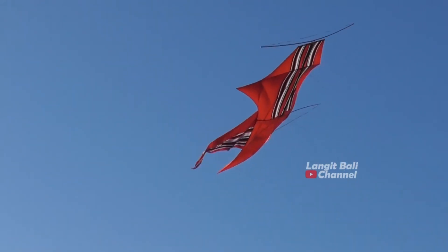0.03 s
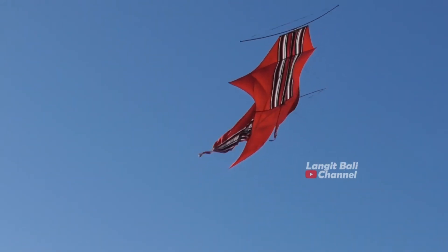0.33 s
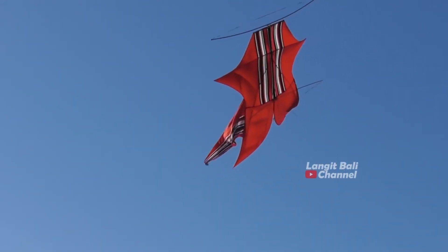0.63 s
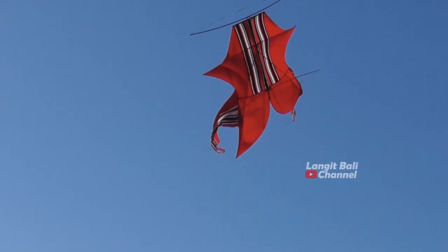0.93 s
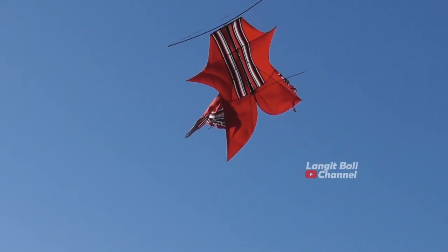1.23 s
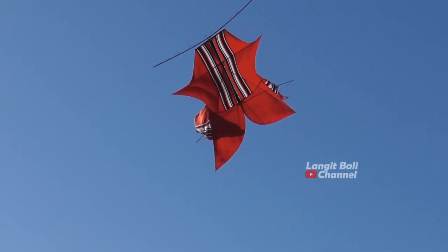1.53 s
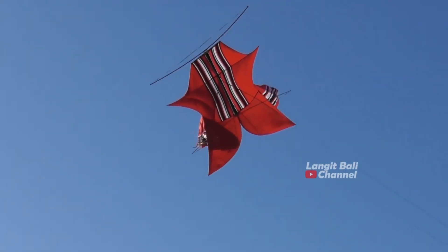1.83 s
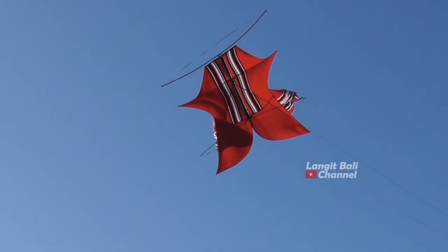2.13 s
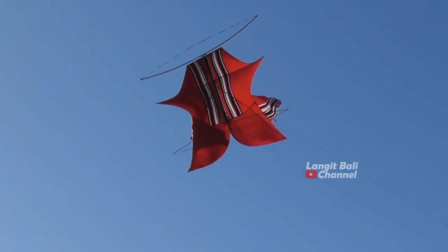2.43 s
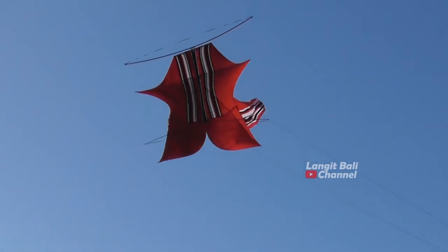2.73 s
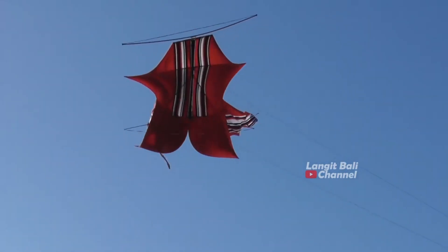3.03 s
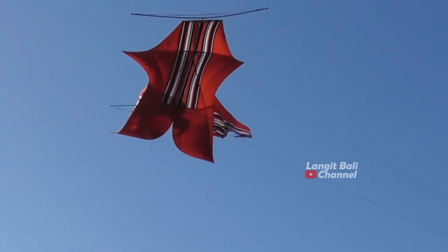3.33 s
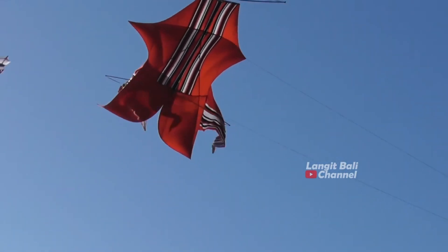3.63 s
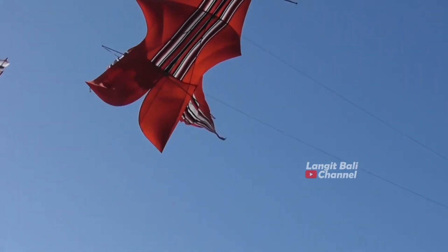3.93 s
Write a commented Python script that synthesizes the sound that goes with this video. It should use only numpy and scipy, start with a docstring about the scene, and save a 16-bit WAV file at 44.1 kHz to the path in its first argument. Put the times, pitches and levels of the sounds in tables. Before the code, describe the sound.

Large kites hum overhead in strong wind, their taut ribbons swooping rapidly in pitch over a steady drone. The nearest one rasps, more strongly later on. Wind hisses and rumbles on the microphone, and a bird chirps faintly once, early.

```python
"""Outdoors in strong wind, big kites fly, each carrying a bow strung with a taut ribbon that hums.
Each ribbon twists to and fro about 13 times a second, so its pitch swoops up and down.
The nearest one rasps at the top of its swoops, a lower one throbs, and the rest blend into a drone.
Wind hisses and rumbles on the microphone, and a bird gives one falling call."""
import sys
import numpy as np
from scipy import signal
from scipy.io import wavfile
from scipy.ndimage import uniform_filter1d, minimum_filter1d

SR = 44100
rng = np.random.default_rng(int(sys.argv[2]) if len(sys.argv) > 2 else 0)


def output_pcm(signal):
    """Save a mono or channel-first signal as 16-bit PCM at the path in sys.argv[1].

    Samples are clipped to [-1, 1] before scaling.
    """
    pcm = np.clip(np.atleast_2d(signal).T, -1, 1) * 32767
    wavfile.write(sys.argv[1], SR, np.round(pcm).astype(np.int16))


N = 176400
TIME = np.arange(N) / SR
HISS_FLICKER_DB, HISS_PAN_DB = 2.5, -0.16


def from_db(db):
    """Turn decibels into a number to multiply a sound by."""
    return 10 ** (np.asarray(db) / 20)


def rms_one(x):
    """Scale a signal so its average strength (rms) is 1."""
    return x / np.sqrt(np.mean(x ** 2) + 1e-20)


def in_time(rows):
    """Join a table's timed points with straight lines, one curve for each column after the time."""
    time_s, *columns = np.transpose(rows)
    return [np.interp(TIME, time_s, column) for column in columns]


def panned(x, pan_db):
    """Raise the left side and lower the right by pan_db."""
    return x * from_db([[pan_db], [-pan_db]])


def drift(rate_hz):
    """A smooth random wobble of typical size 1 that changes about rate_hz times a second."""
    step, warm_up = 40, 2000
    memory = np.exp(-2 * np.pi * step * rate_hz / SR)
    noise = rng.standard_normal(N // step + warm_up + 2)
    slow = signal.lfilter([1], [1, -2 * memory, memory * memory], noise)[warm_up:]
    return np.interp(np.arange(N) / step, np.arange(len(slow)), rms_one(slow))


def air_noise(spectrum, flicker_db):
    """Stereo noise of strength 1, made of half-octave bands that flicker partly together."""
    pitch_hz, *columns = np.transpose(spectrum)
    out, together = 0, drift(4.0)
    edges_hz = 14 * 2 ** np.arange(0, 10.1, .5)
    white = rng.standard_normal((2, 2, N))
    for k, (low, high) in enumerate(zip(edges_hz, edges_hz[1:])):
        if high < pitch_hz[0] or low > pitch_hz[-1]:
            continue
        band = signal.butter(3, [low, high], "band", fs=SR, output="sos")
        middle, side = signal.sosfilt(band, white[k % 2])
        band_db, width_db = (np.interp(np.log(low * high) / 2, np.log(pitch_hz), c) for c in columns)
        stereo = middle + from_db(width_db) * side * [[1], [-1]]
        out = out + from_db(band_db + flicker_db * (together + drift(46)) / 2) * stereo
    return rms_one(out)


def with_echoes(x, echoes):
    """Add the later, quieter copies that bounce off the ground and surroundings."""
    return x + sum(from_db(db) * np.interp(TIME - delay, TIME, x, left=0) for delay, db in echoes)


def bell(x, width):
    """A smooth bump that is 1 where x is 0."""
    return np.exp(-.5 * (x / width) ** 2)


def burst(peak_s, rise_s, fall_s):
    """A smooth rise and fall that reaches 1 at peak_s."""
    width_s = np.where(TIME < peak_s, rise_s, fall_s)
    return np.exp(-.5 * np.minimum(((TIME - peak_s) / width_s) ** 2, 60))


def swoop(swoops, sharpness=1.4):
    """Pitch lift: 1 at each whole swoop, 0 halfway between; sharpness above 1 makes it linger low."""
    return np.abs(np.cos(np.pi * swoops)) ** (2 * sharpness)


def vibration(hz, wander, jitter):
    """A ribbon's phase (its place in the wave); swirling air shakes its pitch slowly and quickly."""
    unsteady = 1 + wander * drift(11.66) + jitter * drift(117.3)
    return 2 * np.pi * (np.cumsum(hz * unsteady) / SR + rng.random())


def wind():
    """Gusts hiss, and air beating on the microphone rumbles."""
    # loudness of the hiss and of the rumble: time_s, level_db
    hiss_levels = [(0, -29), (.15, -34.5), (.3, -31), (.55, -32.5), (1.0, -35), (1.35, -39), (1.6, -35),
                   (2.1, -37), (2.6, -35), (3.1, -36.5), (3.48, -37.5), (3.58, -34), (3.8, -33), (4, -31)]
    rumble_levels = [(0, -22), (.6, -25.5), (1.5, -27.5), (2.3, -27.5), (2.43, -25), (2.52, -21),
                     (2.65, -26), (2.9, -24.5), (3.3, -30), (3.7, -24), (4, -24)]
    # tone of each, from low to high: pitch_hz, relative_level_db, stereo_width_db
    hiss_spectrum = [(406, -11, -13), (736, 7, -12), (1010, -3.5, -7), (1360, -5, -13.5), (2020, -11, -9.5),
                     (2500, -11.5, -26.5), (3955, -18, -27.5), (5400, -33.5, -18.5), (6100, -30.5, -21),
                     (7830, -28.5, -12), (9140, -48.5, -11.5), (11000, -54.5, -14.5), (14000, -72.5, -7.5)]
    rumble_spectrum = [(20, -5, -6.5), (35, -6, -6.5), (59.7, -4, -14.5), (90, -2.5, -7.5), (116, -5, -4),
                       (162, 1, -9), (295, -8, 2), (642, -3, -12), (1080, -37.5, -8)]
    hiss_db, = in_time(hiss_levels)
    rumble_db, = in_time(rumble_levels)
    hiss = from_db(hiss_db) * air_noise(hiss_spectrum, HISS_FLICKER_DB)
    rumble = from_db(rumble_db) * air_noise(rumble_spectrum, flicker_db=-1)
    return panned(hiss, HISS_PAN_DB) + rumble


def bird():
    """One raspy falling chirp, scattered by the surroundings."""
    # the chirp's path: time_s, pitch_hz, level_db
    chirp = [(.733, 8300, -52), (.738, 7600, -40), (.749, 6900, -40), (.764, 5500, -41), (.78, 5100, -40),
             (.80, 4700, -42.5), (.835, 4200, -46), (.866, 3720, -42), (.884, 3550, -53)]
    # its echoes: delay_s, level_db
    echoes = [(.0096, -6), (.019, -13)]
    rasp_hz, tail_db, tail_s = 560, -24, 0.11
    hz, level_db = in_time(chirp)
    sounding = (TIME > chirp[0][0]) & (TIME < chirp[-1][0])
    smoothing = signal.butter(2, rasp_hz, fs=SR, output="sos")
    rasp = rms_one(signal.sosfilt(smoothing, rng.standard_normal((2, N))))
    phase = 2 * np.pi * np.cumsum(hz) / SR
    rough_tone = (1 + rasp[0]) * np.sin(phase) + rasp[1] * np.cos(phase)
    call = sounding * from_db(level_db) * rms_one(rough_tone)
    t = TIME[:SR // 4]
    scatter = rms_one(rng.standard_normal((2, len(t))) * from_db(-60 * t / tail_s)) / np.sqrt(len(t))
    tail = from_db(tail_db) * signal.fftconvolve(call[None], scatter)[:, :N]
    return panned(with_echoes(call, echoes) + tail, pan_db=-1.5)


def far_ribbons():
    """Distant ribbons drone, each swooping at its own pace; distance takes away their treble."""
    # each ribbon before the wind's push: swoops_per_s, bottom_hz, top_hz, level_db
    ribbons = [(12.3, 240, 370, -20), (11.4, 320, 450, -21.5), (13.6, 195, 290, -23), (12.7, 380, 480, -24),
               (10.6, 155, 240, -30)]
    # how the wind pushes them all: time_s, boost_db, pitch_factor
    wind_push = [(0, -2.5, 1.11), (.6, 1, 1.008), (1.1, -1, 1.008), (1.6, 1, 1.011), (2.1, 0.5, 0.99),
                 (2.5, 0.5, 1.01), (2.9, -1, 1), (3.47, -1, 0.96), (3.65, 2, 1.027), (4, 1.5, 0.92)]
    octave_db, swell_db, flutter_db, dull_hz = -12.5, 0.5, 2, 780
    boost_db, pitch_factor = in_time(wind_push)
    out = 0
    for rate, bottom_hz, top_hz, level_db in ribbons:
        swoops = np.cumsum(rate * (1 + .07 * drift(2.238))) / SR + rng.random()
        lift = swoop(swoops)
        hz = pitch_factor * (bottom_hz + (top_hz - bottom_hz) * lift)
        phase = vibration(hz, wander=.03, jitter=.015)
        tone = np.sin(phase) + from_db(octave_db) * lift * np.sin(2 * phase)
        swell = from_db(swell_db * lift + flutter_db * drift(11))
        out = out + from_db(level_db) * rms_one(tone * swell)
    return signal.sosfilt(signal.butter(6, dull_hz, fs=SR, output="sos"), from_db(boost_db) * out)


def low_ribbon():
    """A lower ribbon throbs in short hums that rise slightly in pitch."""
    # one row for each throb: peak_s, pitch_hz, relative_level_db
    throbs = [(0.025, 368, -14.5), (0.069, 301, -11), (.111, 357, -9.5), (.191, 371, -10), (.24, 317, -10),
              (.355, 405, -12.5), (.409, 354, -13.5), (.522, 312, -10), (.605, 301, -12),
              (0.677, 299.6, -15.5), (.757, 305, -10), (.869, 263, -7.5), (0.952, 275.4, -7),
              (1.039, 259.7, -9), (1.121, 247.2, -4.5), (1.205, 267.9, -7.5), (1.268, 329, -11.5),
              (1.39, 337, -13), (1.478, 325, -12.5), (1.583, 318, -14), (1.65, 271, -6.5),
              (1.742, 275, -10), (1.847, 277, -10), (2.0, 279.9, -12), (2.088, 285.9, -17),
              (2.171, 280, -13.5), (2.26, 298.5, -12.5), (2.436, 246.3, -8.5), (2.516, 264.9, -6.5),
              (2.6, 291.1, -8.5), (2.67, 298, -13), (2.757, 308.9, -10), (2.872, 264.1, -7),
              (2.965, 282.3, -22), (3.072, 278.4, -12), (3.143, 250, -10.5), (3.601, 318.5, -12),
              (3.694, 322.8, -15.5), (3.891, 273, -19), (3.976, 237.6, -8)]
    half_length_s, rise_hz_per_s, boost_db, octave_db = 0.009, 700, 0.5, -20.5
    out = np.zeros(N)
    for (peak_s, hz, db), start_cycle in zip(throbs, rng.random(len(throbs))):
        sounding = np.abs(TIME - peak_s) < .06
        t = TIME[sounding] - peak_s
        phase = 2 * np.pi * (start_cycle + hz * t + rise_hz_per_s * t ** 2 / 2)
        tone = np.sin(phase) + from_db(octave_db) * np.sin(2 * phase)
        out[sounding] += from_db(boost_db + db) * bell(t, half_length_s) * tone
    return np.sqrt(2) * out


def near_ribbon():
    """The nearest ribbon twists and hums, breaking into a rasp and a hiss at the top of its swoops."""
    # pace of the twisting: time_s, swoops_done
    swoop_counts = [(0, 0), (.268, 3), (.757, 9), (1.304, 16), (1.541, 19), (1.615, 20), (1.93, 24),
                    (2.311, 29), (2.471, 31), (3.085, 39), (3.158, 40), (3.463, 44), (4, 50.3)]
    # the hum before its wobbles and swells: time_s, bottom_pitch_hz, level_db
    hum_path = [(0, 340, -17), (.4, 315, -18.5), (.8, 290, -16.5), (1.15, 270, -17), (1.5, 290, -16),
                (1.8, 275, -19.5), (2.1, 270, -20.5), (2.47, 265, -19), (2.8, 275, -15), (3.3, 275, -21),
                (3.65, 270, -21.5), (4, 260, -18)]
    # one row for each rasp: peak_s, top_pitch_hz, rasp_strength_db, hiss_level_db
    rasps = [(.008, 431.6, -9.5, -49), (.092, 429.3, -8, -41.5), (0.181, 426.6, -12.5, -46.5),
             (0.265, 416.8, -7.5, -44), (0.431, 418.5, -12.5, -39.5), (0.511, 390, -14, -44.5),
             (.595, 374.7, -10, -52), (.675, 372, -11, -48), (.759, 372.3, -5, -42), (0.83, 388.1, -8, -51),
             (0.914, 378, -8, -42), (1.04, 374.6, -15, -38.5), (1.306, 388.3, -5, -39.5),
             (1.383, 374.8, -9.5, -42), (1.467, 417.6, -7.5, -43.5), (1.542, 401.7, -5.5, -40),
             (1.612, 371, -8, -37.5), (1.695, 395, -8, -40), (1.772, 392, -2, -42), (1.932, 372, -11, -41),
             (2.007, 381.6, -7, -50), (2.084, 387.5, -3.5, -38.5), (2.159, 370.6, -8, -37.5),
             (2.233, 378, -4, -38), (2.309, 367.9, -8, -43), (2.39, 392, -3, -37.5),
             (2.469, 410.2, -5.5, -38.5), (2.547, 398, -6.5, -41), (2.62, 379.4, -7.5, -42),
             (2.7, 388, 1, -38.5), (2.778, 388, -3, -44.5), (2.853, 390.8, 2.5, -38),
             (2.932, 379.4, 0, -40.5), (3.006, 383.7, -3.5, -38.5), (3.085, 375.2, -0.5, -38),
             (3.157, 384.3, 3.5, -35), (3.235, 389.8, 0.5, -40.5), (3.31, 395.5, -3, -37),
             (3.389, 386, -2, -39.5), (3.462, 372.8, -2, -42.5), (3.542, 360.4, -4.5, -46),
             (3.615, 368.3, -9, -39.5), (3.728, 379.8, -4, -38.5), (3.805, 362, -4, -40.5),
             (3.89, 409.7, -5.5, -46.5)]
    # the tones in a rasp: pitch_multiple, relative_level_db
    rasp_tones = [(1, -8.5), (2, -14.5), (3, -40), (4, -43)]
    # tone of the rasp's hiss: pitch_hz, relative_level_db, stereo_width_db
    hiss_spectrum = [(500, -1, -13.5), (900, -0.5, -7), (1370, -2, -14.5), (2100, -2.5, -22.5),
                     (2800, -4, -18), (4360, -14, -25), (5940, -23.5, -16), (8640, -29, -11.5),
                     (11000, -45.5, -6), (14000, -72.5, -15)]
    glide_db, bottom_swell_db, flutter_db = -5, 8, 2
    bow_hz, bow_width_hz, bow_db = 1305, 61, 19.5
    hiss_lead_s, blur_radians, crackle_db, roughness = 0.0015, .7, 1.5, .18

    swoops, = in_time(swoop_counts)
    bottom_hz, hum_db = in_time(hum_path)
    top_hz = in_time(rasps)[0]
    bottom_hz = bottom_hz * (1 + .05 * drift(6.135))
    hz = bottom_hz + (top_hz - bottom_hz) * swoop(swoops)
    phase = vibration(hz, wander=.012, jitter=.016)
    # the hum is full at the bottom of a swoop and thins as it glides
    at_bottom = bell(np.cos(np.pi * swoops) / np.pi, width=0.11)
    swell_db = glide_db + bottom_swell_db * at_bottom
    hum = from_db(hum_db + swell_db + flutter_db * drift(31)) * np.sin(phase)

    rasping, hissing = 0, 0
    for peak_s, _, rasp_db, hiss_db in rasps:
        rasping += from_db(rasp_db) * burst(peak_s, rise_s=.0042, fall_s=.0052)
        hissing += from_db(hiss_db) * burst(peak_s - hiss_lead_s, rise_s=.0055, fall_s=.0074)
    # weak rasps are blurred; strong ones ring clean
    rasp_phase = phase + blur_radians * np.clip(1 - rasping, 0, 1) ** 2 * drift(87)
    tones = 0
    for multiple, db in rasp_tones:
        # the bow rings along with any tone that passes through its own pitch
        ring_db = bow_db * bell(multiple * hz - bow_hz, bow_width_hz)
        tones += from_db(db + ring_db) * np.sin(multiple * rasp_phase)
    crackle = rms_one(from_db(crackle_db * drift(200)) * (1 + .5 * np.sin(phase)))
    rasp = rasping * tones * (1 + roughness * drift(200))
    hiss = hissing * crackle * air_noise(hiss_spectrum, HISS_FLICKER_DB)
    return np.sqrt(2) * (hum + rasp), hiss


def scene():
    """Kites overhead, the wind and the bird, mixed in stereo."""
    # the kites' echoes from the ground and surroundings: delay_s, level_db
    echoes = [(.0096, -23), (.031, -13)]
    fade_s = .006
    from_edge_s = np.minimum(TIME, TIME[-1] - TIME)
    fade = np.sin(np.pi / 2 * np.minimum(from_edge_s / fade_s, 1)) ** 2
    hum, hiss = near_ribbon()
    kites = with_echoes((hum + low_ribbon() + far_ribbons()) * fade, echoes)
    return panned(kites, pan_db=.88) + panned(hiss, HISS_PAN_DB) + wind() + bird()


def record(dry):
    """A limiter briefly turns everything down at too-loud peaks; the highest treble is then cut."""
    limit, attack_s, recovery_db_per_s, cutoff_hz = .9, .004, 90, 13500
    over_db = np.maximum(20 * np.log10(np.abs(dry).max(axis=0) / limit + 1e-9), 0)
    recovery_db = recovery_db_per_s * TIME
    held_db = np.maximum.accumulate(over_db + recovery_db) - recovery_db
    span = int(attack_s * SR)
    gain_db = uniform_filter1d(minimum_filter1d(-held_db, size=span), size=span)
    treble_cut = signal.cheby2(12, 70, cutoff_hz, fs=SR, output="sos")
    return signal.sosfilt(treble_cut, dry * from_db(gain_db))


dry = scene()
out = record(dry)
output_pcm(out)
```